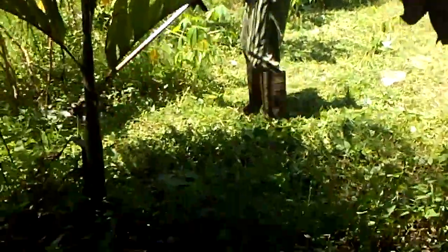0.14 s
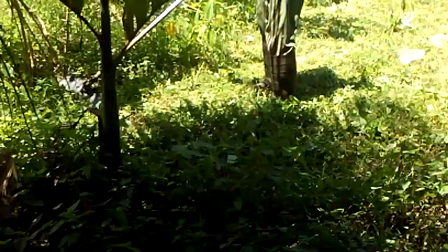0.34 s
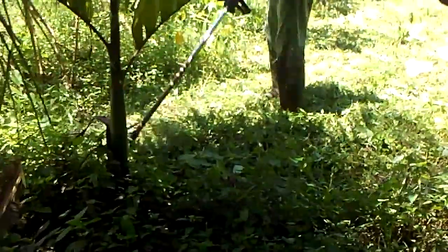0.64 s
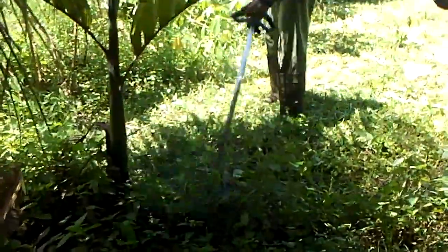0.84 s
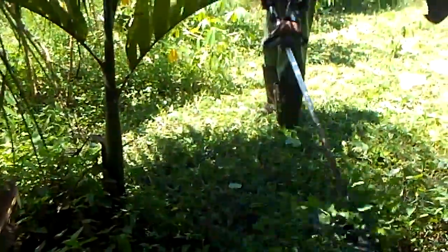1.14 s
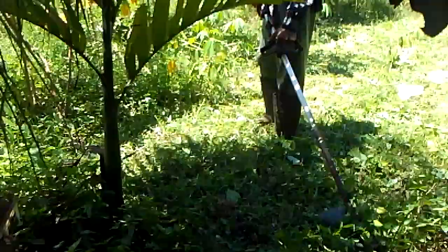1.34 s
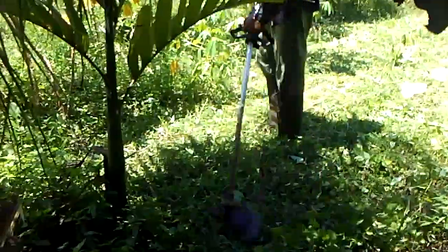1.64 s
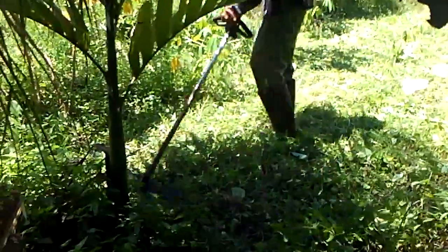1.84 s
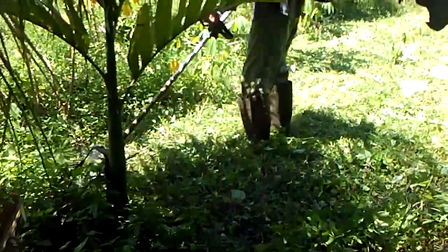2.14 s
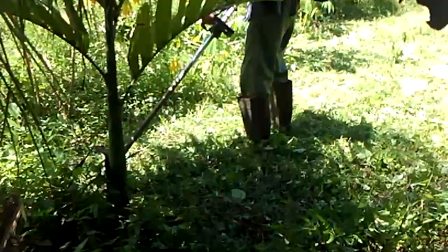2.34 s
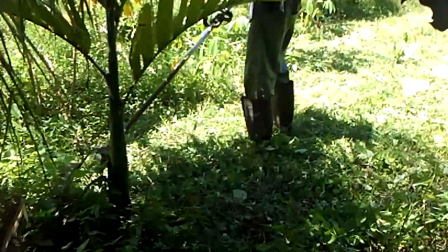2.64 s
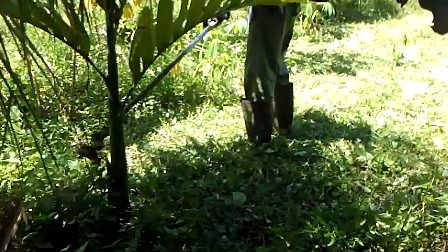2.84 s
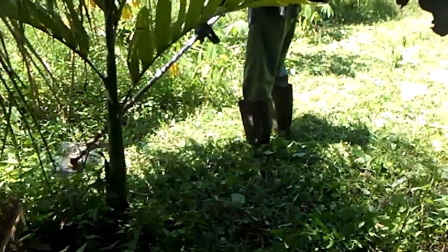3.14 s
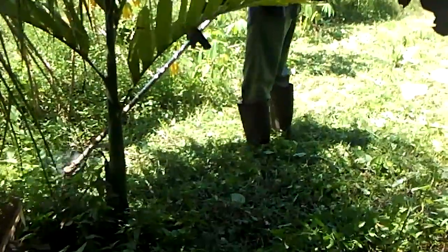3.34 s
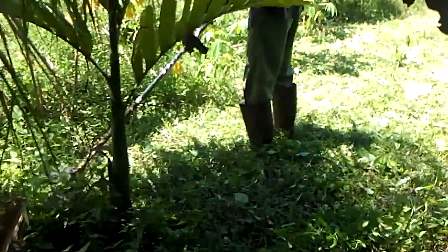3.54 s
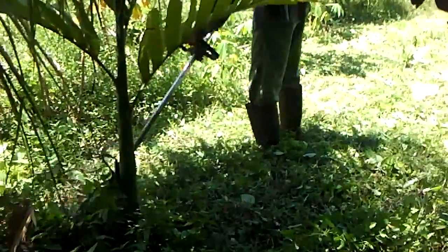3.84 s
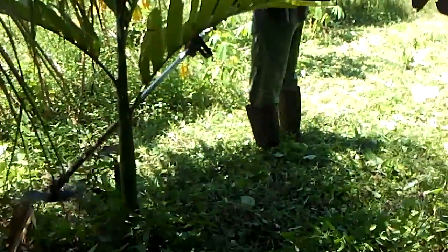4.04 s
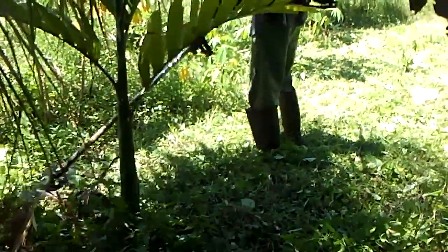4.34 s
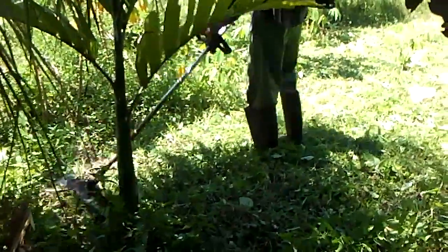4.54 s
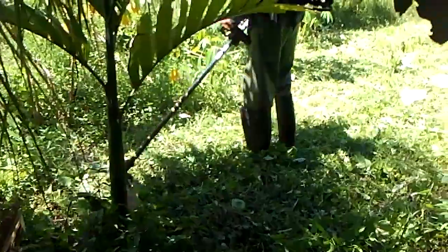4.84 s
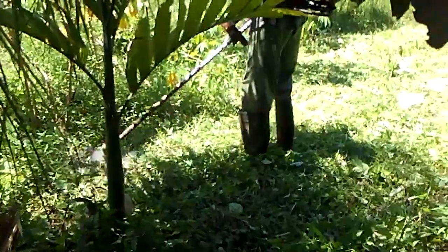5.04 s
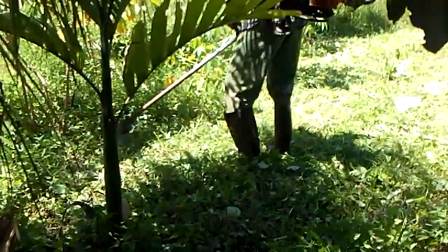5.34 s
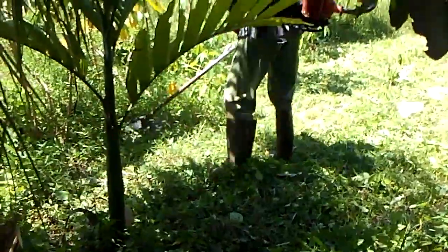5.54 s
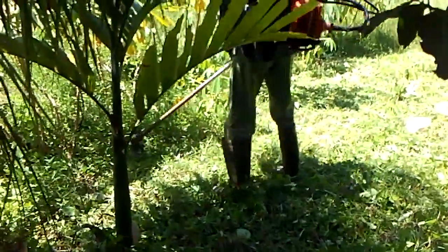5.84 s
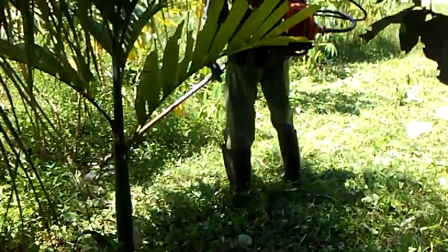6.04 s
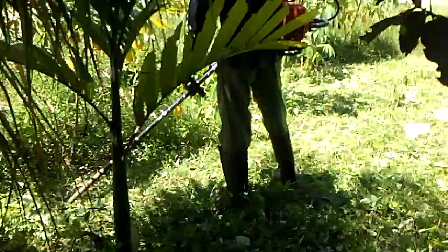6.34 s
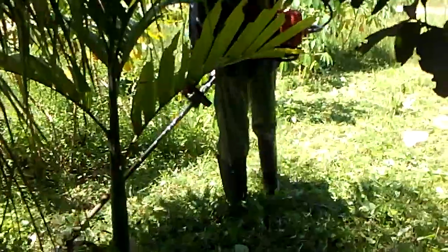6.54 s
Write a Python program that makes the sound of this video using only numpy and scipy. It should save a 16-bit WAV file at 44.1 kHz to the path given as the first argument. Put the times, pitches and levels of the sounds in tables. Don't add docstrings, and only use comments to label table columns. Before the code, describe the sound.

A petrol brush cutter is already running and never stops, a few metres away in open air, heard through a small microphone with thin bass and no obvious reverberation. The two-stroke engine makes a rough, nasal buzz around 80 pulses a second, irregular heavier bangs giving it a stuttering burr, with intake howl, metallic casing rasp and faint whine. Grass hisses and swishes softly beneath. Revs rise near 0.6 s; around 1 s a couple of stalks crack, the operator turns away, and the bangs dull while pitch drops and blade ringing grows. By 2 s it faces back, brighter. A tight burst of woody cracks with brief falters comes at 2.8-2.95 s, scattered knocks follow, then another cluster at 4.0-4.1 s, lower and half turned. The engine labours until about 5 s, brightens, then from 5.9 s revs up into a louder, hollow, booming drone, easing down at 6.6 s.

```python
import sys
import numpy as np
from scipy import signal
from scipy.fft import rfft, irfft
from scipy.io import wavfile
from scipy.ndimage import uniform_filter1d, minimum_filter1d

SR = 44100
rng = np.random.default_rng(int(sys.argv[2]) if len(sys.argv) > 2 else 0)


def int16_out(signal):
    q = np.round(np.clip(np.atleast_2d(signal).T, -1, 1) * 32767)
    wavfile.write(sys.argv[1], SR, q.astype(np.int16))


def invert_db(x):
    u = np.asarray(x, float) / 20
    return 10 ** u


N = 294588
T = np.arange(N) / SR

# [t/s, speed/turns per s]
SPEED = [(0.0, 82.18), (0.4, 84.35), (0.56, 88.05), (1.34, 74.95), (1.83, 76.01), (2.01, 79.74),
         (2.48, 82.72), (2.58, 81.2), (2.78, 85.67), (3.06, 82.62), (3.54, 82.07), (3.8, 74.96),
         (4.6, 74.92), (5.1, 75.8), (5.73, 77.87), (5.95, 83.72), (6.38, 86.46), (6.68, 77.94)]
# [t/s, speed loss/turns per s]
SAGS = [
    (1.53, -1.83),
    (2.2, 1.99),
    (2.985, 3.68),
    (4.09, 1.36),
    (4.68, 2.9),
]
# [t/s, speed loss/turns per s]
SNAGS = [(0.06, 0.86), (0.24, -0.6), (0.46, -0.61), (0.68, -0.51), (0.8, 0.61), (1.08, -0.91), (1.26, 0.7),
         (1.42, -0.55), (1.54, 0.93), (1.76, 0.93), (1.9, -0.51), (1.98, 0.37), (2.34, -0.28), (2.86, 0.23),
         (3.08, 0.48), (3.22, -0.75), (3.8, 0.75), (3.88, -0.51), (4.0, 0.43), (4.1, 0.36), (4.18, -0.43),
         (4.34, -0.21), (4.54, 1.06), (4.64, -0.61), (4.78, 0.75), (4.92, -0.63), (5.4, -0.79), (5.6, 0.73),
         (5.84, -0.33), (5.94, 0.31), (6.04, -0.39), (6.2, 0.62), (6.28, -0.2), (6.36, -0.83), (6.5, 0.18),
         (6.64, -1.16)]
# [start t/s, turns between full burns, extra level/dB]
FIRING = [(0.007, 2.5, 1.0), (0.093, 2, 0.0), (0.485, 5, -0.0), (0.543, 2, 0.0), (0.634, 2.5, -1.0),
          (0.751, 3, 1.0), (1.03, 3, 2.0), (1.105, 2.5, 1.0), (1.26, 3, 1.0), (1.34, 2.5, -0.0),
          (1.562, 3, -0.0), (1.641, 2, 0.0), (1.865, 2, 1.0), (2.031, 2, 1.0), (2.068, 2, 1.0),
          (2.094, 3, 1.0), (2.195, 2, 1.0), (2.356, 2, 2.0), (2.405, 2.5, 2.0), (2.441, 2.5, 0.0),
          (2.599, 2, 1.0), (2.767, 5, -1.0), (2.898, 2, 1.0), (2.959, 2, 1.0), (3.133, 2.5, 1.0),
          (3.169, 2, -0.0), (3.278, 5, 0.0)]
# [start t/s, turns between full burns, extra level/dB]
FIRING_LATE = [(3.375, 4, -1), (3.485, 3, 0), (3.571, 4, -3), (3.621, 6, 3), (3.697, 3.5, 0),
               (3.802, 2.5, -1), (3.907, 2.5, -3), (3.989, 2, 0), (4.178, 3.5, 2), (4.259, 2.5, 0),
               (4.352, 2.5, 0), (4.419, 3, 0), (4.499, 2.5, 0), (4.581, 2, 0), (4.635, 5, 0), (4.704, 2, 0),
               (4.879, 2, -1), (5.262, 2, 0), (6.023, 2.5, 0), (6.105, 2.5, -1), (6.293, 2.5, -1),
               (6.373, 3, 0), (6.467, 4, -1), (6.626, 2.5, 0)]
# [t/s, intake level/dB, intake tone f/Hz, exhaust level re intake/dB, full burn over plain puff/dB]
ENGINE = [(0, -22.5, 836, 1, 3), (.27, -20.5, 877, -2, 22), (.57, -19.5, 856, -0.5, 18),
          (.9, -21, 830, -1.5, 9), (1.2, -22, 840, 2.5, 11.5), (1.45, -20.5, 910, 0.5, 12.5),
          (1.9, -22.5, 831, 3, 15), (2.4, -20, 843, -1, 5.5), (2.9, -20.5, 820, -1.5, 9.5),
          (3.2, -19.5, 849, -1.5, 4), (3.55, -19, 830, -2.5, 3), (3.8, -21, 885, 1, 11),
          (4.2, -22.5, 854, 2, 13), (4.6, -21, 871, 3.5, 10.5), (5.56, -18, 905, -3, 7.5),
          (5.95, -15.5, 832, -4.5, 9), (6.4, -16, 820, -4.5, 18), (6.68, -20, 808, 0.5, 6)]
# [t/s, share 0-1]
FACING = [
    (0, 1),
    (.9, .9),
    (1.05, .05),
    (1.75, .05),
    (2, .8),
    (2.75, 1),
    (3.5, .8),
    (3.75, .3),
    (4.7, .3),
    (4.9, .8),
    (5.7, .8),
    (5.9, .15),
    (6.68, .25),
]
# [t/s, length/s, level/dB]
BOGS = [
    (1.317, 0.034, -4.5),
    (2.79, 0.043, -4),
    (2.845, 0.028, -6.5),
    (2.925, 0.014, 5),
    (3.959, 0.072, -4),
    (4.18, 0.026, 5.5),
    (4.35, 0.059, 4.5),
    (6.6, 0.03, -3),
]
# [f/Hz, width/Hz, level/dB]
BANG = [(365, 28, 3), (432, 34, 3), (630, 110, -1), (895, 45, 5), (1420, 290, -16)]
# [f/Hz, width/Hz, level/dB]
SILENCER = [(375, 53, 8), (448, 34, -3.5)]
# [f/Hz, width/Hz, level/dB]
CAN = [(304.3, 26, 0)]
# [f/Hz, density/dB per Hz]
BREATH = [(30, -58), (60, -49), (110, -25.5), (170, -20.5), (250, -15), (400, -5), (560, -14.5),
          (850, -3.5), (1150, -11), (1500, -60)]
# [f/Hz, width/Hz, level/dB]
PIPE = [(741, 76, 0.5), (975, 64, -11.5), (1012.5, 53, 1)]
# [f/Hz, width/Hz, level/dB]
CASING = [(1309, 87, 4), (1557, 74, 5.5), (1750, 20, -19), (2020, 100, -10.5), (2310, 230, -42)]
# [f/Hz, density/dB per Hz]
RASP = [(700, -24.5), (1100, -8.5), (1300, 2), (1560, 2), (1780, -5), (2050, -17), (2400, -8),
        (3000, -25.5), (4400, -38.5), (5000, -58)]
# [multiple of crank speed, level/dB rms]
ORDERS_DB = [(1, -61), (1.5, -62), (2, -58.5), (2.5, -57.5), (3, -58)]
# [f/Hz, density/dB per Hz]
RUMBLE = [(25, -44), (60, -35), (102, 4), (130, 10.5), (170, 16.5), (240, 10), (320, -42.5)]
# [t/s, length/s, level/dB]
SHAKES = [
    (.1, 0.083, 7.5),
    (.55, 0.095, 8),
    (1.4, 0.54, 9),
    (1.85, 0.11, 3),
    (2.6, 0.23, 3),
    (3.2, 0.067, 7),
    (4.2, .35, -9),
    (5.4, 0.46, -8),
    (6.5, 0.26, 0.5),
]
# [t/s, cutting level/dB, plate ring level/dB]
CUTTING = [(0, -63, -41.5), (.35, -71, -42.5), (.55, -66, -52.5), (.75, -66, -45.5), (1.1, -62, -35.5),
           (1.6, -60, -31.5), (1.83, -60.5, -39.5), (2.02, -69.5, -39.5), (2.7, -68, -42), (3, -71, -43),
           (3.3, -66, -43), (3.9, -65, -39), (4.25, -74, -43.5), (4.7, -69, -41.5), (5.1, -75, -44.5),
           (6.08, -67, -41), (6.25, -61, -42.5), (6.68, -63.5, -40.5)]
# [t/s, length/s, extra level/dB]
TUFTS = [(.3, 0.053, 4), (1.05, 0.054, 6.5), (2.78, 0.0089, -10), (2.825, .012, 7.5), (2.885, 0.031, 9.5),
         (2.94, 0.038, 7), (3.49, .018, 8), (3.81, .04, 4), (4.04, 0.051, 8), (4.24, 0.008, 7.5),
         (4.35, .025, 11), (4.46, 0.031, 6.5), (4.58, .03, 6.5), (5.17, 0.017, 8), (6.41, 0.069, 4),
         (6.55, 0.042, 3)]
# [f/Hz, density/dB per Hz]
STALKS = [(1500, -19), (2200, 19), (3000, 16), (4050, 6.5), (4700, -1), (5050, -12.5), (5800, -3),
          (6500, -5), (7200, -5.5), (9000, -14), (11000, -21.5), (12000, -53), (13200, -27.5), (15600, -23)]
# [f/Hz, width/Hz, level/dB]
BLADE = [(1920, 188, 2), (2029, 136, -1), (2150, 190, -5.5), (3100, 140, -22.5), (3520, 140, -24),
         (4270, 140, -31.5), (6340, 170, -36), (6670, 170, -34), (7520, 230, -38.5), (8950, 150, -43.5)]
# [t/s, length/s, f/Hz, width/Hz, level/dB]
CHIRRS = [(0.063, 0.16, 2110, 150, -42.5), (0.203, 0.11, 2420, 200, -46.5),
          (0.316, 0.052, 2520, 250, -44.5), (2.905, .03, 1930, 900, -43), (4.028, 0.027, 1980, 300, -38),
          (4.09, 0.017, 1830, 500, -34.5), (6.055, .08, 1930, 250, -48), (6.303, 0.078, 2180, 300, -49.5),
          (6.47, .05, 2485, 500, -45.5), (1.5, 0.27, 6600, 500, -74.5), (3.547, 0.036, 2080, 120, -45),
          (3.55, 0.044, 7000, 2500, -65), (2.206, 0.041, 4400, 800, -67)]
# [t/s, length/s, multiple of crank speed, level re intake/dB]
WHINES = [(0.58, 0.31, 16, -20.5), (0.246, 0.39, 19, -23), (0.62, 0.25, 17, -28), (0.89, 0.25, 19, -26),
          (1.295, 0.75, 16, -17), (1.392, 0.46, 19, -13), (1.302, 0.7, 20, -19.5), (2.1, .25, 17, -30),
          (2.7, 0.37, 19, -27.5), (2.508, 0.24, 19, -19.5), (2.6, 0.33, 16, -20), (3.3, 0.21, 19, -23.5),
          (3.347, 0.31, 16, -16), (5.1, 0.21, 15, -28), (5.5, 0.12, 19, -27), (3.405, 0.42, 20, -24.5),
          (3.8, 0.25, 19, -19.5), (4.308, 0.33, 20, -19), (4.902, 0.2, 20, -33.5), (5.099, 0.18, 23, -19.5),
          (5.36, 0.24, 20, -25), (5.29, .3, 17, -17), (5.903, .15, 19, -26), (5.1, 0.34, 19, -23.5),
          (5.1, 0.17, 20, -23), (6.3, 0.12, 16, -18), (7.7, 0.18, 17, -19.5), (6.0, .2, 21, -27.5),
          (6.3, .15, 16, -23.5), (6.3, 0.1, 17, -21), (6.2, 0.16, 21, -32), (5.6, 0.18, 19, -28),
          (7.5, .15, 20, -21), (4.7, .12, 22, -20.5), (6.55, .1, 22, -21), (5.9, .12, 24, -25)]
# [t/s, length/s, f/Hz, share 0-1]
NULLS = [(5.5, .2, 1020, 0.5), (5, 0.45, 430, .4), (4.2, .3, 510, .3), (5.1, 0.38, 1600, 0.6),
         (6.4, 0.65, 590, 0.9), (6.3, 0.33, 1400, 1), (3.43, 0.18, 1400, 0.7), (2.8, 0.18, 1140, 0),
         (0.66, 0.08, 1900, 0.2), (5.8, 0.25, 710, 0.7), (0.98, 0.14, 520, 0.1), (3.6, 0.055, 870, 0.2),
         (4.5, .2, 760, 0.3)]
# [t/s, peak level/dB, ring f/Hz]
STRIKES = [(1.0181, -25, 2040), (1.04, -34, 1640), (1.6578, -48, 1650), (2.829, -25.5, 1800),
           (2.836, -27, 1570), (2.8673, -22, 1460), (2.874, -24, 1470), (2.879, -25, 1870),
           (2.884, -27, 1300), (2.893, -24, 2120), (2.935, -28, 1880), (3.1733, -29, 1584),
           (3.285, -34, 1600), (3.475, -30, 1610), (3.492, -25, 2020), (3.9878, -27, 1780),
           (3.9958, -21.5, 1920), (4.0188, -27, 1860), (4.037, -25, 2044), (4.0545, -21.5, 1880),
           (4.067, -31, 1770), (4.0825, -26, 1920), (4.0985, -24, 1820), (4.2356, -36, 1630),
           (6.5512, -35, 1590)]

START_TURN, MEAN_TURNS = .07, 80
SAG_S, SNAG_S, FLYWHEEL_S = .1, .05, .1
WOBBLE_DB = .02
BURN_CONTRAST = 1.5
PORT_LEAD_S, ROUND_BODY_S = .00035, .0004
THUD_EDGE, EDGE_FADE = 0.17, .15
BREATH_DB, BREATH_FACING_DB = -10.5, -2
RASP_DB, RASP_AWAY_DB = -11.5, 1
BOOM_DB, BOOM_DB_PER_TURN = -11.5, -0.39
GULP = 0.43
DRONE_PER_TURN, DRONE_BOOM_DB, DRONE_PIPE_DB = 0.096, 8.5, -15
SWISH_DB, SWISH_FOLLOWS, RING_FOLLOWS = -47, 0.62, 0.51


def in_time(rows):
    s, *columns = np.transpose(rows)
    return [np.interp(T, s, c) for c in columns]


def bumps(rows):
    return sum(height * np.exp(-((T - s) / length) ** 2) for s, length, height in rows)


def clumps(per_s, depth_db):
    knots = rng.standard_normal(round(N / SR * per_s) + 2)
    return invert_db(depth_db * np.interp(T * per_s, np.arange(len(knots)), knots))


def rms_one(x):
    return x / np.sqrt(np.mean(x ** 2) + 1e-20)


def evened(x):
    power = uniform_filter1d(uniform_filter1d(x ** 2, size=2200), size=2200)
    return x / np.sqrt(power + 1e-12)


def band(x, low_hz, high_hz, order=3):
    return signal.sosfiltfilt(signal.butter(order, [low_hz, high_hz], "band", fs=SR, output="sos"), x)


def coloured(x, spectrum):
    hz, db = np.transpose(spectrum)
    bins_hz = np.arange(N // 2 + 1) * SR / N
    gain = invert_db(np.interp(np.log(bins_hz + 1), np.log(hz), db))
    return rms_one(irfft(rfft(x) * gain, N))


def narrow(x, hz, width):
    r = np.exp(-np.pi * width / SR)
    poles = [1, -2 * r * np.cos(2 * np.pi * hz / SR), r * r]
    once = signal.lfilter([.5, 0, -.5], poles, x + 1e-18)
    return signal.lfilter([.5, 0, -.5], poles, once + 1e-18)


def puffs(at, sizes, modes, late_s, rise_s):
    clicks, t = np.zeros(N), np.arange(-400, 1200) / SR
    shift = np.round((late_s - PORT_LEAD_S) * SR).astype(int)
    clicks[np.clip(at + shift, 0, N - 1)] = sizes
    ringing = np.maximum(t, 0)
    shape = sum(invert_db(db) * np.cos(2 * np.pi * hz * t) * np.exp(-np.pi * width * ringing)
                for hz, width, db in modes)
    rise = np.exp(-(np.minimum(t, 0) / rise_s) ** 2)
    return signal.fftconvolve(clicks, -shape * rise)[400:N + 400]


def gated(turns, spectrum, depth, lag):
    throb = 1 + np.clip(depth, 0, 1) * np.cos(2 * np.pi * (turns - lag))
    return coloured(throb * rng.standard_normal(N), spectrum)


def crank():
    span = round(FLYWHEEL_S * SR)
    speed = uniform_filter1d(uniform_filter1d(in_time(SPEED)[0], span, mode="nearest"), span, mode="nearest")
    sags = [(s, SAG_S, loss) for s, loss in SAGS]
    snags = [(s, SNAG_S, loss) for s, loss in SNAGS]
    speed = speed - bumps(sags + snags)
    turns = START_TURN + np.cumsum(speed * clumps(per_s=30, depth_db=WOBBLE_DB)) / SR
    at = np.flatnonzero(np.diff(np.floor(turns))) + 1
    chance = rng.standard_normal(len(at))
    start, every, extra_db = np.transpose(FIRING + FIRING_LATE)
    row = np.searchsorted(start, at / SR) - 1
    opening = np.floor(turns[(start * SR).astype(int)] + .8)
    full = (np.floor(turns[at]) - opening[row]) % every[row] < 1
    rich = invert_db(BURN_CONTRAST * extra_db[row] + 1.3 * chance)
    skipped = .15 * invert_db(2.5 * chance)
    burn = invert_db(in_time(ENGINE)[3][at]) * np.where(full, rich, skipped)
    return turns, speed, at, burn


def exhaust(at, burn, drone):
    pumped = invert_db(.8 * rng.standard_normal(len(at)))
    facing = in_time(FACING)[0][at]
    edge = (1 - facing) * np.exp(-drone[at] / EDGE_FADE)
    bang = puffs(at, (facing + THUD_EDGE * edge) * burn, BANG, late_s=0, rise_s=0.0012)
    thud = puffs(at, 0.81 * (1 - facing) * burn, BANG[:1], late_s=0.0015, rise_s=0.0017)
    body = puffs(at, .45 * edge * burn, BANG[2:3], late_s=0.0015, rise_s=0.00097)
    puff = puffs(at, pumped, SILENCER, late_s=.0022 + ROUND_BODY_S * edge, rise_s=.002)
    boom = puffs(at, 0.061 * pumped + burn, CAN, late_s=.0003, rise_s=0.005)
    return evened(band(bang + thud + body + puff, 305.0, 3000)), evened(band(boom, 270, 580))


def howl(turns, speed, burn, hz, gulp):
    size = (1 + .06 * np.r_[0, burn, 0, 0]) * invert_db(.8 * rng.standard_normal(len(burn) + 3))
    turns = turns + PORT_LEAD_S * speed
    turn, part = np.floor(turns).astype(int), turns % 1
    since, until = part / speed, (1 - part) / speed
    fade = np.exp(-(since / (0.00062 + 0.0018 * gulp)) ** 2)
    swell = np.exp(-(until / (0.0014 + 0.0029 * gulp)) ** 2)
    swell = swell + np.clip(gulp, 0, 1) * np.exp(-((until - .0045) / 0.0039) ** 2)
    after = size[turn] * fade * np.cos(2 * np.pi * hz * since)
    before = size[turn + 1] * swell * np.cos(2 * np.pi * hz * until)
    return evened(band(-after - before, 600, 1054, order=2))


def pipe_ring(at, burn):
    return evened(band(puffs(at, 1 + 0.0093 * burn, PIPE, late_s=.0012, rise_s=0.0041), 650, 1032))


def knock(at, burn):
    slap = puffs(at, 1 + 0.11 * burn, CASING, late_s=.0074, rise_s=0.00074)
    reed_sizes = 0.6 * invert_db(1.8 * rng.standard_normal(len(at)))
    reed = puffs(at, reed_sizes, CASING, late_s=-0.002, rise_s=0.0001)
    return evened(band(slap + reed, 1100, 2600))


def crank_orders(turns):
    return sum(invert_db(db + 5.0) * np.sin(2 * np.pi * k * turns) for k, db in ORDERS_DB)


def shaft_rumble(turns, away):
    level_db = -52.5 + 2.0 * away + 0.97 * bumps(BOGS) + bumps(SHAKES)
    return invert_db(level_db) * clumps(per_s=11.0, depth_db=1.5) * gated(turns, RUMBLE, depth=.5, lag=0.2)


def grains(per_s, spread_db):
    sizes = invert_db(spread_db * np.minimum(rng.exponential(1, N), 4.5)) * rng.choice([-1, 1], N)
    return .5 * rng.standard_normal(N) + sizes * (rng.random(N) < per_s / SR)


def blade_in_grass(turns, snaps):
    tuft_db = bumps(TUFTS)
    cutting_db, ring_db = in_time(CUTTING)
    cutting_db = cutting_db + tuft_db
    ring_db = ring_db + RING_FOLLOWS * np.minimum(tuft_db, 8)
    swish_db = SWISH_DB + SWISH_FOLLOWS * (cutting_db + 66.0)
    fine = coloured(snaps, STALKS)
    swish = band(fine, 910, 4900, order=4) * clumps(per_s=14, depth_db=2.0)
    swish = swish * (1 + 0.11 * np.cos(2 * np.pi * (turns - .3)))
    hiss = band(fine, 4700, 9000, order=4) * clumps(per_s=29, depth_db=2.0)
    hiss = hiss + band(fine, 9000, 16500, order=4) * clumps(per_s=18, depth_db=3.0)
    ring = rms_one(sum(invert_db(db) * narrow(snaps, hz, width) / np.sqrt(width) for hz, width, db in BLADE))
    return invert_db(cutting_db) * rms_one(hiss) + invert_db(swish_db) * rms_one(swish) + invert_db(ring_db - 3.5) * ring


def chirrs(snaps):
    return sum(bumps([(s, length, invert_db(db))]) * rms_one(narrow(snaps, hz, width))
               for s, length, hz, width, db in CHIRRS)


def whine(turns):
    out = np.zeros(N)
    for s, length, multiple, db in WHINES:
        near = slice(max(round((s - 3 * length) * SR), 0), round((s + 3 * length) * SR))
        swell = invert_db(db) * np.exp(-((T[near] - s) / length) ** 2)
        out[near] += swell * np.sin(2 * np.pi * round(multiple) * turns[near])
    return out * clumps(per_s=25, depth_db=1.5)


def ground(x):
    return x - sum(bumps([(s, length, np.clip(share, 0, 1))]) * band(x, 0.98 * hz, 1.075 * hz, order=1)
                   for s, length, hz, share in NULLS)


def strikes():
    out, t = np.zeros(N + 1500), np.arange(1500) / SR
    cracks = rng.standard_normal((len(STRIKES), 1500))
    for (s, peak_db, hz), crack in zip(STRIKES, cracks):
        ring = np.sin(2 * np.pi * hz * t) * np.exp(-t / 0.0023)
        rasp = invert_db(4.5) * crack * np.exp(-t / 0.0073)
        out[round(s * SR):][:1500] += invert_db(peak_db) * (1.1 * ring + rasp)
    return band(out[:N], 920, 3020, order=2)


def scene():
    turns, speed, at, burn = crank()
    level_db, howl_hz, exhaust_db, _ = in_time(ENGINE)
    level_db = level_db + bumps(BOGS)
    away, revs = 1 - in_time(FACING)[0], speed - MEAN_TURNS
    drone = DRONE_PER_TURN * away * np.maximum(revs, 0)
    rasp_db = RASP_DB + RASP_AWAY_DB * away
    boom_db = BOOM_DB + BOOM_DB_PER_TURN * revs + DRONE_BOOM_DB * drone
    breath_db = exhaust_db + BREATH_DB + BREATH_FACING_DB * (1 - away)

    bangs, boom = exhaust(at, burn, drone)
    engine = invert_db(exhaust_db - 4.5) * bangs + invert_db(boom_db - 7.0) * boom
    engine += invert_db(-4.0) * howl(turns, speed, burn * (.2 - 0.84 * away[at]), howl_hz, GULP + drone)
    engine += invert_db(DRONE_PIPE_DB * drone - 9.5) * pipe_ring(at, burn)
    engine += invert_db(rasp_db - 8.5) * knock(at, burn)
    engine += invert_db(rasp_db - 8) * gated(turns, RASP, depth=.6, lag=.6)
    engine += invert_db(breath_db) * gated(turns, BREATH, depth=.3, lag=.1)
    engine = signal.sosfilt(signal.butter(4, 6500, fs=SR, output="sos"), engine)
    engine = ground(engine)

    snaps = grains(per_s=790, spread_db=4.0)
    mix = invert_db(level_db) * (engine + whine(turns))
    mix += invert_db(0.5 * (level_db + 24.5)) * crank_orders(turns)
    mix += shaft_rumble(turns, away)
    mix += blade_in_grass(turns, snaps) + chirrs(snaps) + strikes()
    return mix[None]


def roll_off(x):
    return signal.sosfilt(signal.butter(12, 15760, fs=SR, output="sos"), x)


def record(dry):
    cut = signal.sosfilt(signal.butter(2, 55, "high", fs=SR, output="sos"), dry)
    held = -minimum_filter1d(-np.abs(cut), size=301)
    gain = np.minimum(1, .56 / (held + 1e-9))
    limited = cut * uniform_filter1d(uniform_filter1d(gain, size=150), size=150)
    mix = signal.sosfilt(signal.butter(2, [11200, 13000], "stop", fs=SR, output="sos"), limited)
    return roll_off(mix)


dry = scene()
out = record(dry)
int16_out(out)
```